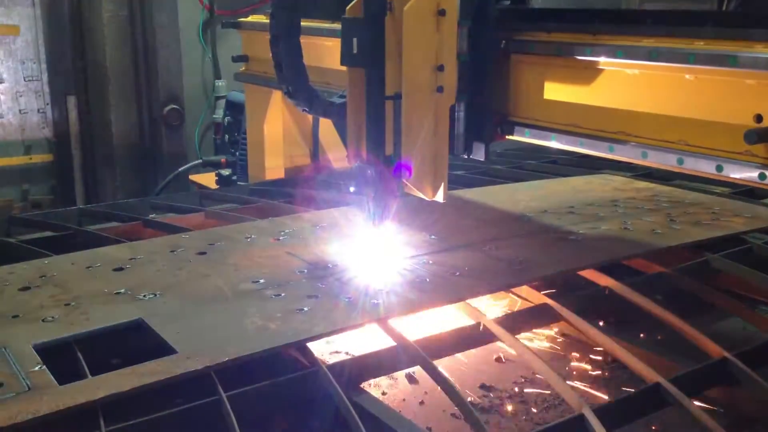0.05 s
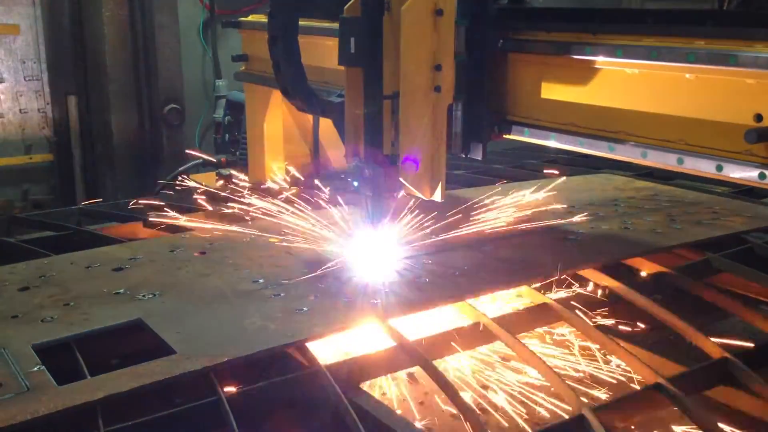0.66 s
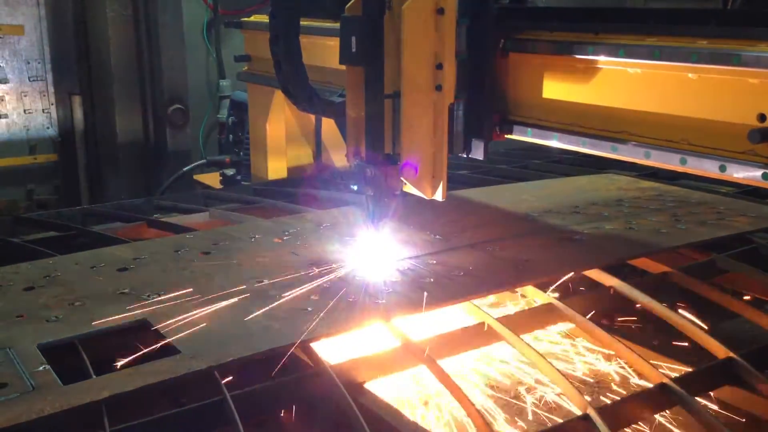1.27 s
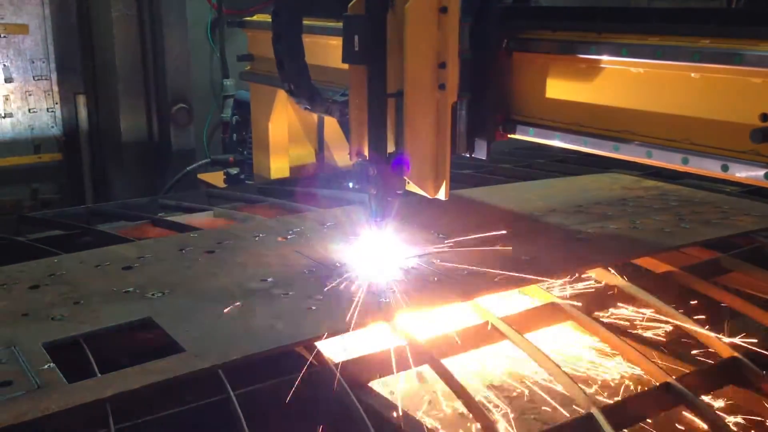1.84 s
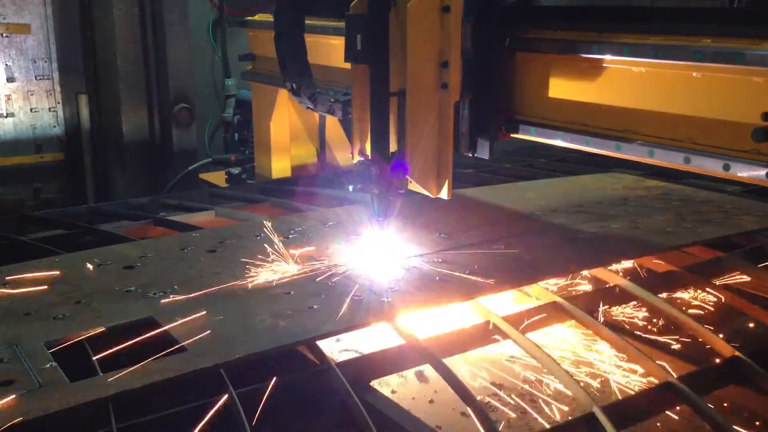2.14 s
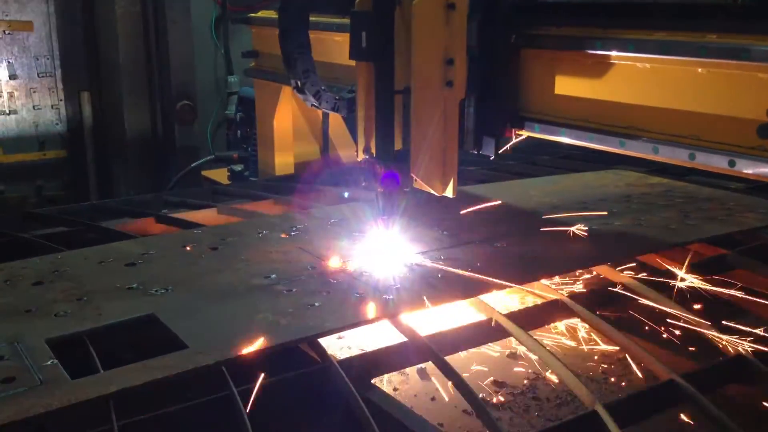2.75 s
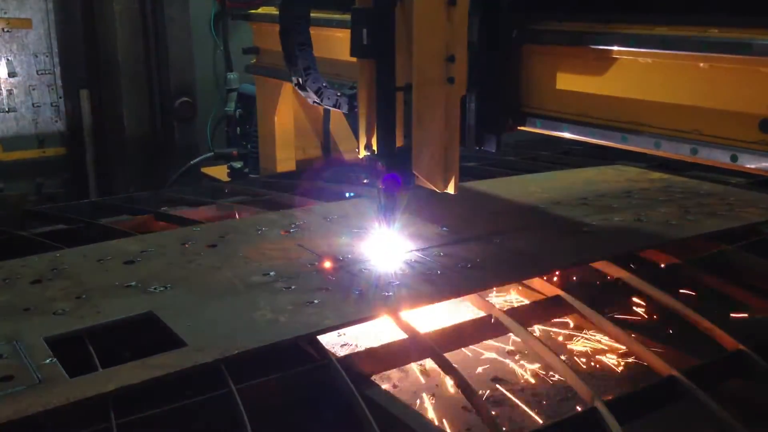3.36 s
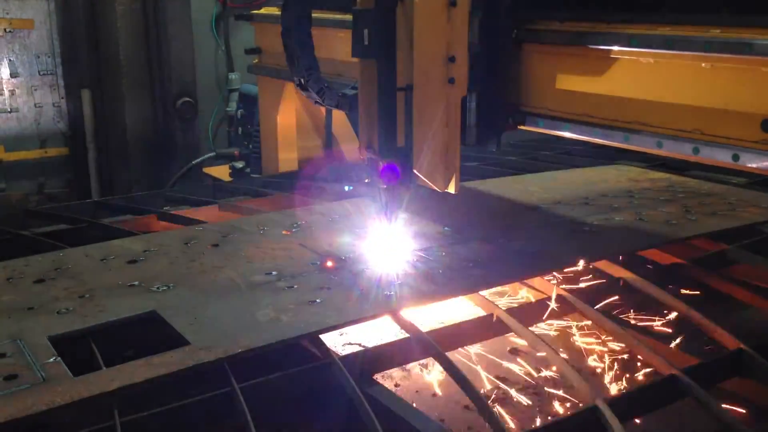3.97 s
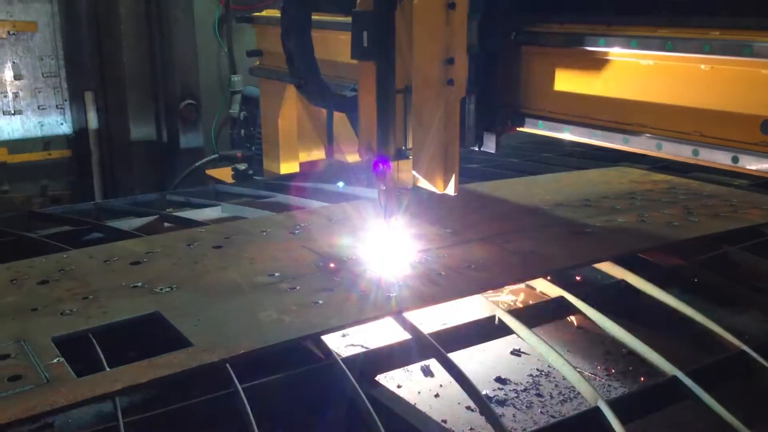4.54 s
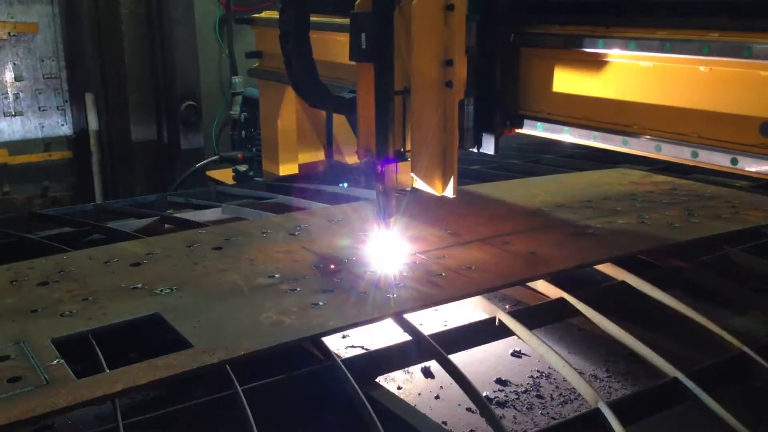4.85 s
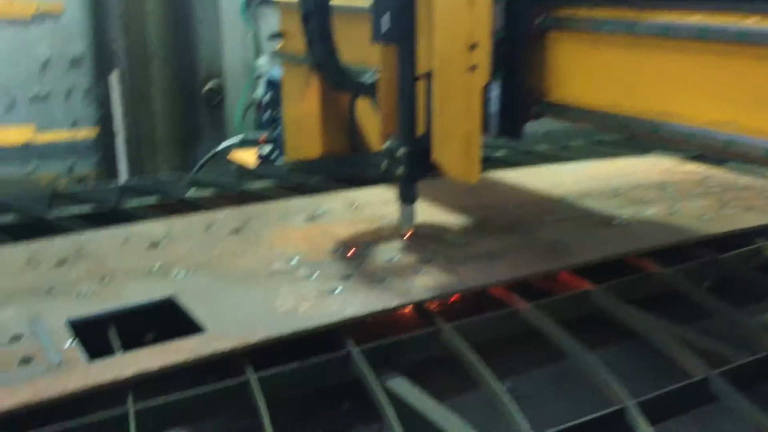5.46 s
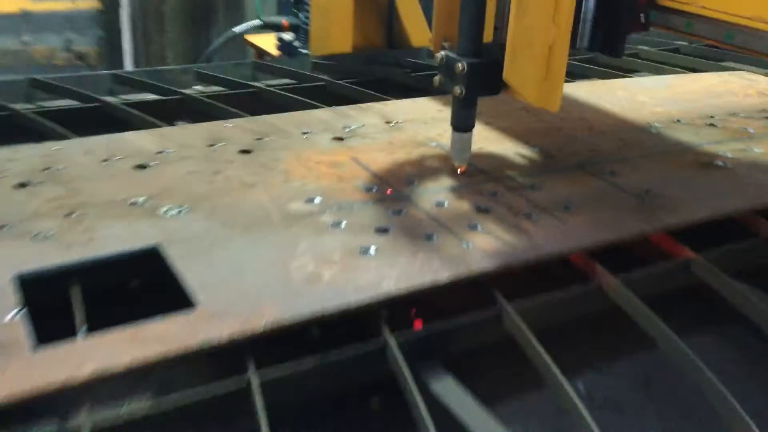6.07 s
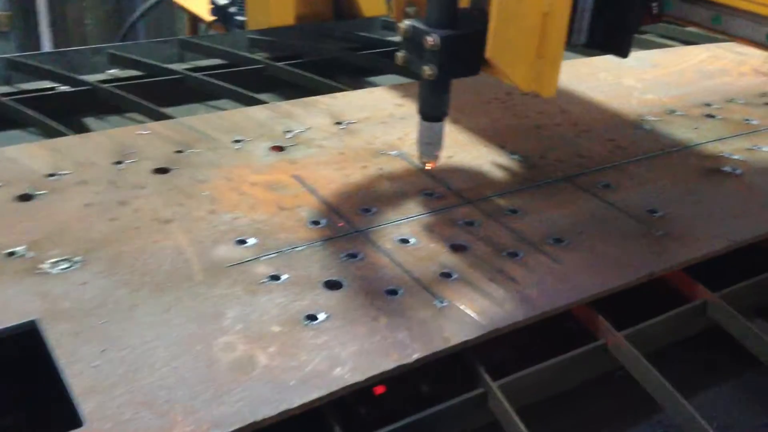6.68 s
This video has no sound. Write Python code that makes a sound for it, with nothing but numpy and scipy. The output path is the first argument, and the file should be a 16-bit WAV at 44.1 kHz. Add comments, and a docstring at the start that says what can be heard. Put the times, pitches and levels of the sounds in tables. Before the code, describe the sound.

From the start, a plasma torch cuts steel plate with a loud, bright hiss and sizzle over a softer flame roar. Shrill resonances come and go in the hiss as the torch travels, and a few brief surges break its flow. An extraction fan rumbles low in the workshop background throughout. At about 1 second the arc sputters for a quarter of a second, a dense crackle with several sharp pops, then the cutting hiss carries on. At about 5.1 seconds the arc goes out with one loud pop and the jet drops away at once, leaving a short tail in the hall. A quieter, high hiss of cooling air remains, swelling and growing fuller until about 6.6 seconds, with a faint thin whistle rising in level near the end. The sound is mono, from a hand-held microphone a little way off, with slight handling rumble late on.

```python
"""A workshop, a hand-held microphone a little way from a CNC plasma torch cutting a hole in steel plate.
From the start the gas jet hisses through the kerf, whose resonances shift as the torch travels, and an
extraction fan rumbles behind it. About a second in, the arc sputters; at five seconds it goes out with
a pop. After that the hiss of the cooling air swells and grows fuller, with a thin whistle. Mono."""
import sys
import numpy as np
from scipy import signal
from scipy.fft import rfft, irfft, next_fast_len
from scipy.io import wavfile
from scipy.ndimage import uniform_filter1d, map_coordinates

SR = 44100
rng = np.random.default_rng(int(sys.argv[2]) if len(sys.argv) > 2 else 0)


def wav_record(signal):
    """Record a signal, one row per channel, as 16-bit PCM in the file named by sys.argv[1]."""
    frames = np.transpose(np.atleast_2d(signal))
    bounded = np.clip(frames, -1, 1)
    # unit amplitude maps onto the largest positive 16-bit level
    quanta = np.round(bounded * 32767).astype(np.int16)
    wavfile.write(sys.argv[1], SR, quanta)


N = 295911
T = np.arange(N) / SR
ARC_OFF_S = 5.078
SWELL_START_S, SWELL_END_S = 5.22, 6.58  # the air hiss swells after the arc goes out

# Tone of each source at the microphone. Each row: frequency in Hz, relative level in dB.
HANDLING_SPECTRUM = [(20, -16), (40, -16), (90, 0), (150, -4), (300, -20), (600, -70)]
FAN_SPECTRUM = [(25, -42), (60, -38), (90, -27), (125, -7.5), (190, -3.5), (300, 0.5), (380, -0.5),
                (480, -4.5), (760, -5), (1100, -8.5), (2500, -24), (6000, -60)]
AIR_SPECTRUM = [(400, -20), (750, -15), (1300, -6), (2400, -4.5), (3200, -4), (4600, -6), (6000, -5),
                (8800, -1), (10800, -1.5), (12500, -3.5), (15300, 1.5)]
KICK_SPECTRUM = [(25, -41), (70, -31), (120, -11), (200, 1.5), (450, -2.5), (800, -3), (1400, -4.5),
                 (2400, -6), (5000, -21.5), (15000, -48)]
JET_SPECTRUM = [(300, -8), (560, -21), (760, -10.5), (1400, -8), (2000, -6.5), (2500, -8), (3200, -4),
                (4500, -2.5), (6500, -3.5), (9500, 3.5), (12500, 2), (15300, 0)]
# Level of the low rumble as heard: fades in at the start, comes up again after the arc stops.
# Each row: time in seconds, relative level in dB.
RUMBLE_LEVELS = [(.22, -52), (.32, -45), (1.35, -47), (1.7, -43), (3.6, -42), (4.05, -45), (4.7, -46.5),
                 (6.2, -40), (6.7, -40)]
# Resonances of the gap between nozzle and plate.
# Each row: start and end in seconds, centre and width in Hz, lift in dB.
GAP_RESONANCES = [(6.5, 6.9, 1040, 90, 5), (6.4, 6.9, 2070, 120, 7), (6.1, 6.9, 2750, 300, -4),
                  (6.4, 6.9, 3270, 300, 4), (5.1, 6.9, 4250, 700, 3), (5.1, 6.9, 6550, 700, -1.5),
                  (5.1, 6.9, 7380, 400, 3.5), (5.0, 5.3, 9380, 240, 6), (6.3, 6.9, 11300, 200, 4),
                  (6.35, 6.9, 14000, 3500, -3)]
# Volleys of the sputtering arc.
# Each row: start and loudest moment in seconds, level in dB, rise and fall in dB a second.
SPUTTER_VOLLEYS = [(0.967, 1.028, -16.5, 330, 650), (1.037, 1.093, -22, 130, 200),
                   (1.088, 1.138, -17, 170, 273), (1.146, 1.175, -18.5, 300, 430)]
# Single pops, the last as the arc goes out. Each row: time in seconds, relative level in dB.
BIG_POPS = [(1.026, -13), (1.148, -13), (1.174, -11), (1.1795, -11), (1.226, -22), (5.072, -4.5)]
# Echoes off the table and gantry. Each row: delay in seconds, level in dB against the direct sound.
MACHINE_ECHOES = [(.0021, -6), (.0044, -10), (.0078, -14)]
# The flame under the plate, fullest in mid-cut. Each row: time in seconds, level in dB before surges.
FLAME_LEVELS = [(0, -34), (1.3, -33), (1.8, -28.5), (2.4, -30), (3.1, -30.5), (3.35, -33), (5.05, -31.5)]
# The jet as the torch travels. Each row: time in seconds, relative levels of hiss and sizzle in dB.
JET_LEVELS = [(0.0, -25, -19), (0.66, -20, -14.5), (0.76, -23.5, -15.5), (1.12, -21.5, -19.5),
              (1.18, -27, -23), (1.23, -25.5, -19), (1.83, -20, -16.5), (2.07, -20.5, -14.5),
              (2.17, -20, -17.5), (3.16, -20.5, -17.5), (3.25, -21.5, -19), (3.99, -19.5, -15.5),
              (4.15, -22, -17.5), (4.5, -20, -15.5), (4.65, -20.5, -18), (5.0, -21, -16.5),
              (5.03, -20.5, -18.5)]
# Surges of the jet. Each row: moment of breaking off in seconds, swell before and dip after in dB.
JET_SURGES = [(.44, 3, 4), (2.1, 1, 2.5), (2.49, 2, 3), (3.19, 3, 1.5), (4.58, 3, 3.5)]
# Resonances the kerf keeps throughout the cut. Each row: centre and width in Hz, lift in dB.
KERF_RESONANCES = [(794, 95, 6.5), (1030, 80, 4), (1734, 99, 5.5), (2600, 160, -3.5), (2830, 180, 4),
                   (3570, 360, 2.5), (4380, 500, 2), (8830, 270, 2.5)]
# Shrieks, where the slot rings for a stretch of the cut.
# Each row: start and end in seconds, centre and width in Hz, lift in dB.
KERF_SHRIEKS = [(0, 1.1, 14000, 3000, 2.5), (.5, .85, 8790, 380, 4), (1.7, 2.7, 10060, 300, 5),
                (2.3, 3.3, 5620, 320, 3.5), (2.6, 3.15, 8740, 460, 5.5), (2.85, 3.3, 10700, 260, 4.5),
                (3.3, 5.1, 1990, 400, 2.5), (3.3, 4.1, 5020, 220, 4), (3.6, 5.1, 4230, 200, 5),
                (4.2, 5.1, 6120, 260, 3.5), (4.5, 4.62, 3690, 200, 5)]


def amp(db):
    """Decibels to gain."""
    return 10 ** (np.asarray(db) / 20)


def unit(x):
    """Scale to rms 1."""
    return x / np.sqrt(np.mean(x ** 2) + 1e-20)


def spectrum_db(spectrum, hz):
    """A spectrum's level at hz, read on a log frequency axis."""
    row_hz, row_db = np.transpose(spectrum)
    return np.interp(np.log(hz + 1), np.log(row_hz + 1), row_db)


def curves(rows):
    """One value per sample for each column after the time."""
    times, *columns = np.transpose(rows)
    return [np.interp(T, times, column) for column in columns]


def wobble(rate):
    """A smooth random curve, rate knots a second."""
    return map_coordinates(rng.standard_normal(int(N * rate / SR) + 4), [T * rate])


def rise_and_fall(peak_s, db, rise, fall):
    """Gain that climbs to a peak and drops again, at steady rates in dB a second."""
    return amp(db - rise * np.maximum(peak_s - T, 0) - fall * np.maximum(T - peak_s, 0))


def swell_level_db(start_db, gain_db, lateness):
    """A layer's level through the closing swell; the higher the lateness, the later the gain comes."""
    progress = np.clip((T - SWELL_START_S) / (SWELL_END_S - SWELL_START_S), 0, 1)
    return start_db + gain_db * progress ** lateness


def filtered(x, response):
    """Filter x by a gain given as a function of frequency."""
    size = next_fast_len(N + SR // 2)
    return irfft(rfft(x, size) * response(np.fft.rfftfreq(size, 1 / SR)), size)[..., :N]


def band(x, lo_hz, hi_hz):
    """One steep band of a noise, held at rms 1."""
    part = filtered(x, lambda hz: 1 / np.sqrt((1 + (lo_hz / (hz + 1)) ** 20) * (1 + (hz / hi_hz) ** 20)))
    power = np.abs(uniform_filter1d(part ** 2, size=SR // 6))
    return part / np.sqrt(power + 1e-12)


def turbulence(spectrum, resonances, patchy_db):
    """Gas noise with drifting narrow patches and wandering resonances that flicker and fade in and out."""
    hz, times, noise = signal.stft(rng.standard_normal(N), SR, nperseg=2048)
    patches = rng.standard_normal(noise.shape)
    for _ in range(2):
        patches = uniform_filter1d(uniform_filter1d(patches, size=3, axis=0), size=9, axis=1)
    db = spectrum_db(spectrum, hz)[:, None] + patchy_db * unit(patches)
    for start, end, centre, width, lift in resonances:
        fade = np.clip(np.minimum(times - start, end - times) / .16 + .7, 0, 1)
        drift = np.interp(times, T, wobble(4))
        flicker = 1 + .35 * np.interp(times, T, wobble(10))
        detune = (hz[:, None] - centre) / width + .1 * drift
        db = db + lift * fade * flicker * .5 ** ((2 * detune) ** 2)
    return unit(signal.istft(noise * amp(db), SR, nperseg=2048)[1][:N])


def handling():
    """The microphone rumbles faintly in the hand, in lumps, louder towards the end."""
    rumble = unit(filtered(rng.standard_normal(N), lambda hz: amp(spectrum_db(HANDLING_SPECTRUM, hz))))
    return amp(swell_level_db(start_db=-79, gain_db=22, lateness=4.5) + 3.1 * wobble(7.3)) * rumble


def extraction_fan():
    """In the background, a low rumble with an unsteady blade hum."""
    level_db, = curves(RUMBLE_LEVELS)
    blade_hz = 168 + 2.24 * wobble(12)
    hum = np.sin(2 * np.pi * np.cumsum(blade_hz) / SR) * amp(-12.5 + 3.9 * wobble(9.7))
    gain = amp(level_db + 4.5 + 0.88 * wobble(4))
    return gain * (turbulence(FAN_SPECTRUM, [], patchy_db=2.0) + hum)


def cooling_air():
    """Cold air blows on the plate and whistles across the fresh hole; its lower bands swell last."""
    gas = turbulence(AIR_SPECTRUM, GAP_RESONANCES, patchy_db=2.5)
    rush = amp(swell_level_db(start_db=-43.5, gain_db=17, lateness=3.6)) * band(gas, 560, 2570)
    hiss = amp(swell_level_db(start_db=-40, gain_db=19.8, lateness=2.43)) * band(gas, 2980, 5250)
    sizzle = amp(swell_level_db(start_db=-34.5, gain_db=14.8, lateness=0.82)) * band(gas, 5750, 14350)
    whistle_hz = 1518 + 6 * wobble(40)
    whistle_gain = rise_and_fall(peak_s=8, db=-32, rise=36, fall=170)  # still rising when the scene ends
    tone = np.sqrt(2) * np.sin(2 * np.pi * np.cumsum(whistle_hz) / SR)
    whistle = whistle_gain * amp(1.6 * wobble(18)) * tone
    arc_is_out = np.clip((T - ARC_OFF_S) / 0.0083, 0, 1)
    return (rush + hiss + sizzle + whistle) * arc_is_out


def pressure_kick(size=4096):
    """One pressure kick of the arc, with a sharp front and peak 1."""
    magnitude = amp(spectrum_db(KICK_SPECTRUM, np.fft.rfftfreq(size, 1 / SR)))
    cepstrum = irfft(np.log(magnitude))
    cepstrum[1:size // 2] *= 2  # minimum phase packs the energy at the front
    cepstrum[size // 2 + 1:] = 0
    kick = irfft(np.exp(rfft(cepstrum)))
    return kick / np.abs(kick).max()


def arc_pops(kicks_per_s=1500, thump_hz=1500, thump_db=3.5):
    """The unsteady arc fires dense volleys of small kicks, and a few big ones that echo off the machine."""
    unrest = sum(rise_and_fall(*shape) * (T > start) for start, *shape in SPUTTER_VOLLEYS)
    kick = pressure_kick()
    hits = (rng.random(N) < kicks_per_s / SR) * rng.choice([-1, 1], N)
    volleys = unit(signal.fftconvolve(hits, kick)[:N]) * unrest
    pops = np.zeros(N)
    for time_s, db in BIG_POPS:
        for delay_s, path_db in [(0.00059, 0)] + MACHINE_ECHOES:  # the direct sound arrives first
            pops[round((time_s + delay_s) * SR)] -= amp(db + path_db)
    # A big pop is duller and heavier than the small kicks.
    thumps = amp(thump_db) * signal.lfilter(*signal.butter(2, thump_hz, fs=SR), pops)
    return volleys + signal.fftconvolve(thumps, kick)[:N]


def jet_surges_db(build_s=0.021, snap_s=0.013, recover_s=0.027):
    """In each surge the jet builds up, snaps into a dip and recovers."""
    total = np.zeros(N)
    for break_s, swell_db, dip_db in JET_SURGES:
        broken = np.clip((T - break_s) / snap_s + .5, 0, 1)
        away_s = np.abs(T - break_s)
        total += (1 - broken) * swell_db * np.exp(-away_s / build_s)
        total -= broken * dip_db * np.exp(-away_s / recover_s)
    return total


def cutting_jet():
    """A little way from the microphone, hot gas shrieks through the kerf and the flame roars with it."""
    hiss_db, sizzle_db = curves(JET_LEVELS)
    flame_db, = curves(FLAME_LEVELS)
    surge_db = jet_surges_db() + 0.64 * wobble(14)
    lasting = [(0, T[-1], *resonance) for resonance in KERF_RESONANCES]
    gas = turbulence(JET_SPECTRUM, lasting + KERF_SHRIEKS, patchy_db=2.5)
    flame = amp(flame_db + surge_db + 0.43 * wobble(40)) * band(gas, 470, 2580)
    hiss = amp(hiss_db - 0.1 + surge_db + 0.37 * wobble(45)) * band(gas, 2555, 6880)
    # The top of the hiss feels a surge less.
    sizzle = amp(sizzle_db + 0.24 + 0.64 * surge_db + 0.77 * wobble(22.05)) * band(gas, 6800, 17300)
    # When the arc dies the jet drops at once, leaving a weak tail in the hall.
    since_off_s = np.maximum(T - ARC_OFF_S, 0)
    direct = amp(-60 * since_off_s / 0.055)
    hall_tail = amp(-12.5 - 60 * since_off_s / 0.55)
    return (flame + hiss + sizzle) * np.maximum(direct, hall_tail)


def scene():
    """Torch and workshop at one microphone, alike in both channels."""
    mono = cutting_jet() + arc_pops() + cooling_air() + extraction_fan() + handling()
    return np.array([mono, mono])


def record(dry, ceiling=.85, top_hz=15350):
    """The recorder rounds the highest peaks and keeps nothing above its band limit."""
    rounded = dry / (1 + np.abs(dry / ceiling) ** 8) ** (1 / 8)
    return filtered(rounded, lambda hz: hz < top_hz)


dry = scene()
out = record(dry)
wav_record(out)
```